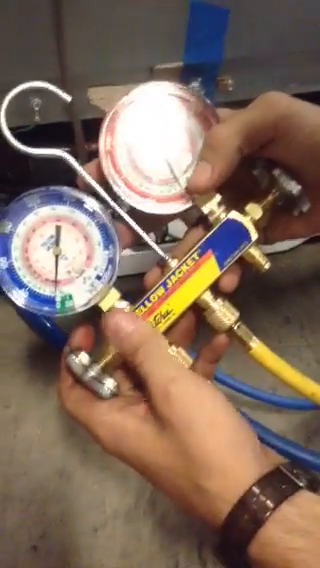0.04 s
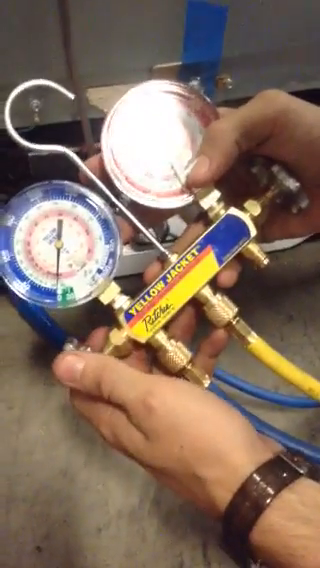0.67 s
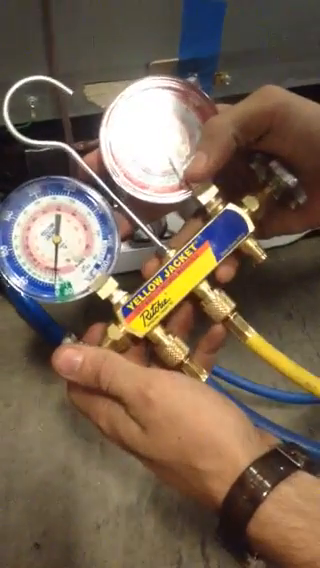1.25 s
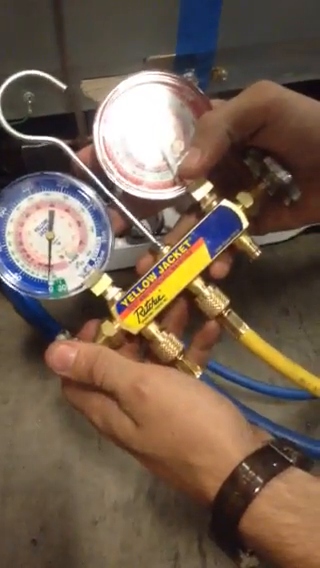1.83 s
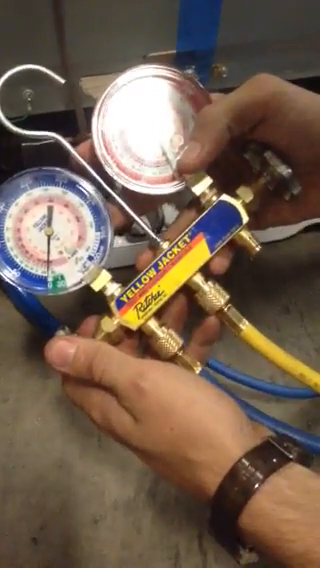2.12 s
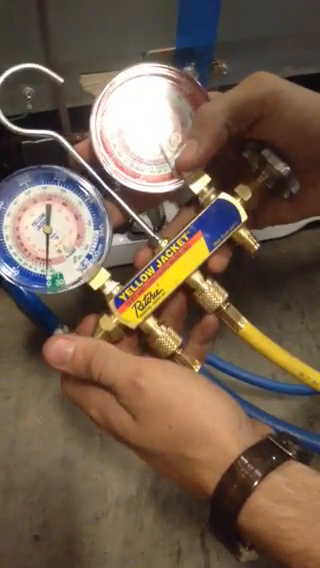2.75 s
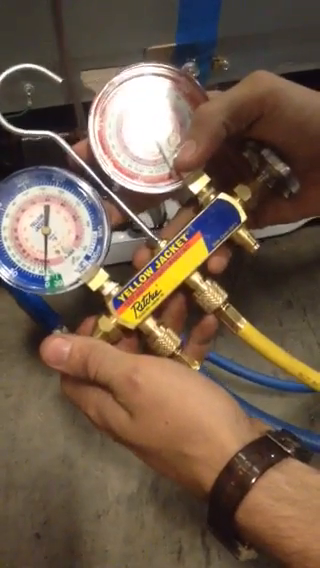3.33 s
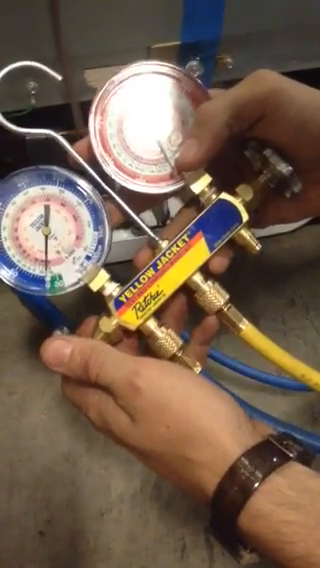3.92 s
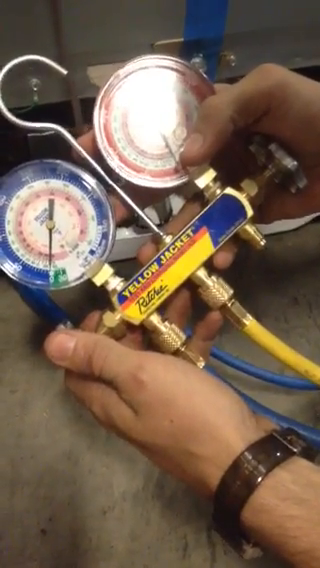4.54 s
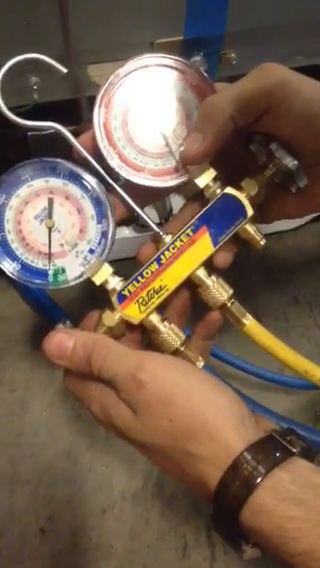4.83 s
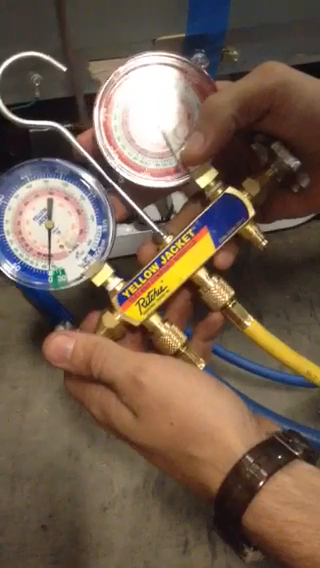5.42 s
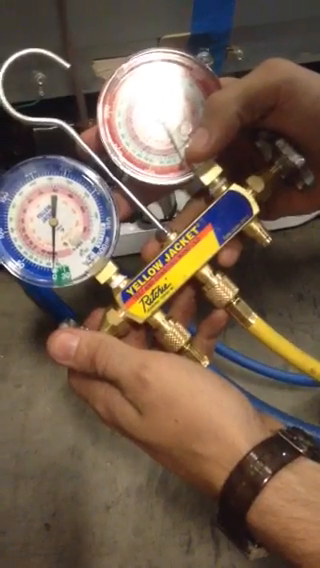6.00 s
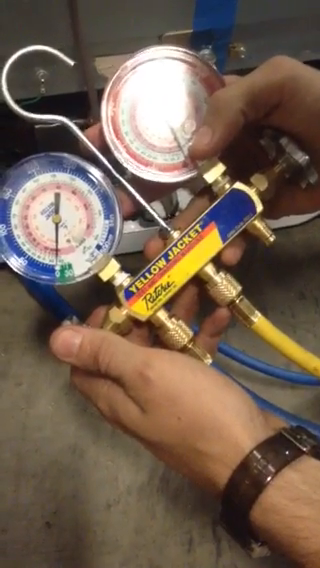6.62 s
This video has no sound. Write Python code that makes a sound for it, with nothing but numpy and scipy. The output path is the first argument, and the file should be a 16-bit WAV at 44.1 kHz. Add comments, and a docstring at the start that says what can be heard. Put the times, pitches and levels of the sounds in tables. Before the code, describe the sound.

A refrigerant recovery machine runs in a room, its piston compressor giving an even drone under the rush and steady tone of a fan. Close by, gas hisses through brass valves and hoses with a slight flutter and a thin whistling edge. Drops of liquid spit through the valve in brief, high ticks at irregular moments. The hiss eases a little in the second half while the machine keeps going.

```python
"""A steady drone, a fan's rush and a spitting hiss: a refrigerant recovery machine runs in a room.
Its piston compressor drones on multiples of the shaft speed, under the air noise and tone of the fan.
Refrigerant hisses through valves and hoses, pulses with the pistons and eases as the system empties.
Drops of liquid spit as they pass the valve."""
import sys
import numpy as np
from scipy import signal
from scipy.fft import rfft, irfft
from scipy.io import wavfile

SR = 44100
rng = np.random.default_rng(int(sys.argv[2]) if len(sys.argv) > 2 else 0)


def put_to_file(sound):
    """Save the sound as 16-bit audio at rate SR, in the file named by the first command-line argument."""
    columns = np.atleast_2d(sound).T  # one column per channel
    safe = np.clip(columns, -1, 1)
    whole_steps = np.round(safe * 32767)
    wavfile.write(sys.argv[1], SR, whole_steps.astype(np.int16))


N = 293706
TIME_S = np.arange(N) / SR
BINS_HZ = np.fft.rfftfreq(N, 1 / SR)
SHAFT_HZ, CREEP_HZ_PER_S = 29.4, 0.004  # speed creeps up as the load lightens

# Shaft harmonics the casing radiates strongly. Each entry: harmonic number, level in dB.
CASING_DRONE_DB = {7: -54, 9: -51, 10: -40, 11: -45, 12: -46, 13: -43.5, 15: -58, 17: -50, 18: -55, 19: -54,
                   20: -52, 21: -52, 25: -57, 28: -52, 29: -49, 30: -55, 33: -54, 44: -56, 46: -60, 50: -55,
                   52: -55, 53: -55, 66: -54, 68: -53, 80: -58}
# Envelope of the other harmonics. Each row: frequency in Hz, level in dB.
CASING_BUZZ = [(30, -100), (120, -95), (240, -77), (650, -59.5), (1100, -65), (1700, -61), (2100, -64),
               (2400, -66), (2700, -68.5), (4000, -80)]
# Motor hum at twice mains, then blade tone and overtones. Each row: frequency in Hz, level in dB.
FAN_TONES = [(120, -62.5), (539.3, -41), (1078.6, -55), (1617.9, -61), (2157.2, -60)]
# Air noise of the fan. Each row: frequency in Hz, density in dB per Hz.
FAN_RUSH = [(25, -110), (65, -104), (90, -85.5), (175, -73), (205, -61.5), (270, -56), (375, -58),
            (430, -67), (640, -65.5), (690, -81), (1050, -74.5), (2300, -71), (3000, -81.5), (6000, -100)]
# Housing resonances. Each row: centre in Hz, width in Hz, density in dB per Hz.
HOUSING_MODES = [(314, 56, -65), (521, 35, -60.5), (600, 64, -64.5), (736, 40, -66), (870, 78, -62.5),
                 (948, 58, -65), (1115, 44, -69), (1286, 43, -66), (1510, 91, -70.5), (1983, 275, -67.5),
                 (2270, 145, -68)]
# Broad gas hiss. Each row: frequency in Hz, density in dB per Hz.
GAS_HISS = [(1000, -103), (2500, -77.5), (3300, -71.5), (4200, -70.5), (5000, -67.5), (6600, -67),
            (7000, -71.5), (7400, -71), (8250, -68), (10300, -69), (10900, -67), (13800, -69), (14300, -66),
            (15250, -69)]
# Hose and valve body resonances. Each row: centre in Hz, width in Hz, density in dB per Hz.
VALVE_MODES = [(3670, 280, -70.5), (5505, 110, -64), (5760, 113, -60.5), (6046, 180, -59), (6430, 140, -71)]
# Whistles of the narrow valve seat. Each row: centre in Hz, width in Hz, density in dB per Hz.
SEAT_MODES = [(7550, 210, -65.5), (7670, 206, -62.5), (7920, 250, -61), (8570, 120, -64.5),
              (8840, 120, -66.5), (9240, 110, -63.5), (9680, 140, -65), (12350, 90, -74),
              (12660, 120, -67.5), (14640, 280, -63), (15100, 170, -64)]
# Large drops passing the valve. Each row: time in seconds, peak in dB, pitch in Hz.
LARGE_DROPS = [(1.5264, -19, 5790), (1.6947, -15, 5760), (1.9663, -20, 6130), (2.0652, -22.5, 6000),
               (2.2714, -20, 6040), (2.677, -17, 5780), (3.7647, -20.5, 6000), (4.0044, -18, 6120),
               (5.7069, -19, 5700), (6.2534, -17, 5960), (6.3534, -18, 6020), (2.9174, -25, 3910),
               (3.0204, -25, 3620), (3.0874, -25, 3700), (4.4458, -21.5, 4500), (5.3318, -25, 4360)]
# Two ranges of small drops. Each row: mean peak in dB, mean pitch in Hz, pitch spread in Hz.
SMALL_DROP_RANGES = [(-23, 5980, 300), (-32, 4100, 450)]


def amp(db):
    """Decibels to gain."""
    return 10 ** (np.asarray(db) / 20)


def unit_rms(x):
    """Scale to rms 1."""
    return x / np.sqrt(np.mean(x ** 2) + 1e-20)


def curve_gain(points, hz):
    """Gain of a dB curve, interpolated over log frequency."""
    points_hz, points_db = np.transpose(points)
    return amp(np.interp(np.log(hz + 1), np.log(points_hz + 1), points_db))


def mode_gain(modes):
    """Gain per bin of steep-sided resonances; powers add."""
    gains = (amp(db) / (1 + 2 * ((BINS_HZ - hz) / width_hz) ** 2) for hz, width_hz, db in modes)
    return np.sqrt(sum(gain ** 2 for gain in gains))


def noise(gain_per_root_hz):
    """Noise with the given spectrum."""
    return irfft(rfft(rng.standard_normal(N)) * gain_per_root_hz, N) * np.sqrt(SR / 2)


def wander(rate_hz):
    """Low-passed noise, rms 1."""
    return unit_rms(noise((BINS_HZ > 0) / (1 + (BINS_HZ / rate_hz) ** 4)))


def waver(rate_hz):
    """Complex drift from six random sines, rms about 1."""
    grid_s = np.linspace(0, TIME_S[-1], 1500)
    speed, phase_turns = rng.uniform(-1, 1, (2, 6, 1))
    sines = np.exp(2j * np.pi * (rate_hz * speed * grid_s + phase_turns))
    return np.interp(TIME_S, grid_s, sines.sum(0) / np.sqrt(len(sines)))


def compressor(turns, drift_depth=0.43, scatter_db=2, harmonics=120, boost_db=4, fade_db_per_s=1.9):
    """Knocks repeat each turn; casing and room scatter their harmonics in level and phase."""
    shaft = np.exp(2j * np.pi * turns)
    out, harmonic = np.zeros(N), np.ones(N, complex)
    strongest = max(CASING_DRONE_DB, key=CASING_DRONE_DB.get)
    for k in range(1, harmonics + 1):
        harmonic = harmonic * shaft
        scatter = amp(scatter_db * rng.standard_normal())
        if k in CASING_DRONE_DB:
            gain = amp(CASING_DRONE_DB[k]) * (1 + drift_depth * waver(rate_hz=1.98))
        else:
            gain = curve_gain(CASING_BUZZ, k * SHAFT_HZ) * scatter
        if k == strongest:
            gain = gain * amp(boost_db - fade_db_per_s * TIME_S)
        out += (gain * harmonic * np.exp(2j * np.pi * rng.random())).real
    return np.sqrt(2) * out


def fan(turns, shake_depth=0.069, drift_depth=0.11):
    """Air rushes through the housing, shaken once a turn, under blade and motor tones."""
    air = noise(np.hypot(curve_gain(FAN_RUSH, BINS_HZ), mode_gain(HOUSING_MODES)))
    shake = 1 + shake_depth * np.cos(2 * np.pi * turns)
    tones = np.zeros(N)
    for hz, db in FAN_TONES:
        drift = 1 + drift_depth * waver(rate_hz=2.09)
        tones += amp(db) * (np.exp(2j * np.pi * hz * TIME_S) * drift).real
    return air * shake + np.sqrt(2) * tones


def gas_jet(strokes, flow_db, flutter_db=0.77, stroke_db=0.21, crossover_hz=7000):
    """Turbulent gas hisses; its treble sinks as the flow eases."""
    hiss = curve_gain(GAS_HISS, BINS_HZ)
    treble_share = 1 / (1 + (crossover_hz / (BINS_HZ + 1)) ** 6)
    low = noise(hiss * np.sqrt(1 - treble_share))
    high = noise(hiss * np.sqrt(treble_share))
    return (low + high * amp(flow_db)) * amp(flutter_db * wander(rate_hz=45) + stroke_db * strokes)


def valve_seat(flow_db, flicker_db=1.24, top_above_hz=14000, swell_at_s=5.2, swell_s=0.6, swell_db=3):
    """The narrow seat whistles with the flow; the top whistles instead hold, then swell late."""
    top_db = swell_db * np.clip((TIME_S - swell_at_s) / swell_s, 0, 1)
    out = np.zeros(N)
    for hz, width_hz, db in SEAT_MODES:
        whistle = noise(mode_gain([(hz, width_hz, db)]))
        trend_db = top_db if hz > top_above_hz else flow_db
        flicker = np.sqrt(2) * waver(rate_hz=25).real
        out += whistle * amp(trend_db + flicker_db * flicker)
    return out


def valve_body(strokes, stroke_db=1.6, sputter_db=1.44):
    """Gas rings hose and valve; suction strokes pulse it, wet gas makes it sputter."""
    return noise(mode_gain(VALVE_MODES)) * amp(stroke_db * strokes + sputter_db * wander(rate_hz=22))


def spit(hz, rise_s=0.00065, fall_s=0.0041, whistle_width_hz=170, spray_width_hz=1200, spray_gain=0.15):
    """A drop chokes the valve for milliseconds: a fuzzy whistle in spray, peaking mid-buffer."""
    time_s = np.arange(-1024, 1024) / SR
    offset_hz = np.fft.rfftfreq(len(time_s), 1 / SR) - hz
    whistle_bins, spray_bins = rfft(rng.standard_normal((2, len(time_s))))
    narrow_noise = irfft(whistle_bins / (1 + (offset_hz / whistle_width_hz) ** 2))
    whistle = np.cos(np.angle(signal.hilbert(narrow_noise)))  # phase only: constant amplitude
    spray = unit_rms(irfft(spray_bins / (1 + (offset_hz / spray_width_hz) ** 4)))
    age_s = time_s + rise_s
    envelope = 1 / (np.exp(-age_s / rise_s) + np.exp(age_s / fall_s))
    return (whistle + spray_gain * spray) * envelope / envelope.max()


def drops(spread_db=2, small_per_range=16):
    """Liquid spits through the valve: large drops at set times, small ones at random."""
    events = list(LARGE_DROPS)
    for db, hz, spread_hz in SMALL_DROP_RANGES:
        for moment, size, pitch in rng.random((small_per_range, 3)):
            drop_db = db + spread_db * (2 * size - 1)
            drop_hz = hz + spread_hz * (2 * pitch - 1)
            events.append((moment * TIME_S[-1], drop_db, drop_hz))
    out = np.zeros(N)
    for at_s, db, hz in events:
        burst = amp(db) * spit(hz)
        index = round(at_s * SR) - len(burst) // 2 + np.arange(len(burst))
        inside = (index >= 0) & (index < N)
        out[index[inside]] += burst[inside]
    return out


def scene(flow_start_db=0.65, flow_hold_s=2.2, ease_db_per_s=0.36):
    """One shaft times drone, shake and gas pulses; the flow holds, then eases. Dual mono."""
    turns = np.cumsum(SHAFT_HZ + CREEP_HZ_PER_S * TIME_S) / SR
    strokes = np.cos(4 * np.pi * turns)  # two suction strokes a turn
    flow_db = flow_start_db - ease_db_per_s * np.maximum(TIME_S - flow_hold_s, 0)
    machine = compressor(turns) + fan(turns)
    gas = gas_jet(strokes, flow_db) + valve_seat(flow_db) + valve_body(strokes)
    mono = machine + gas + drops()
    return np.array([mono, mono])


def record(dry, low_cut_hz=58, high_cut_hz=15290):
    """A small microphone drops the deep bass; a steep low-pass caps the treble."""
    highpass = signal.butter(3, low_cut_hz, "highpass", fs=SR, output="sos")
    lowpass = signal.firwin(1023, high_cut_hz, window=("kaiser", 8), fs=SR)
    return signal.oaconvolve(signal.sosfilt(highpass, dry), lowpass[None], "same", axes=1)


dry = scene()
out = record(dry)
put_to_file(out)
```